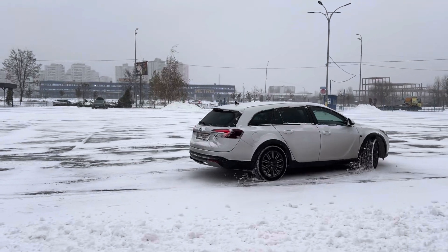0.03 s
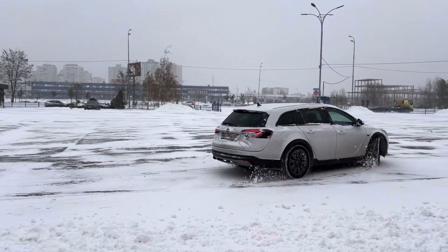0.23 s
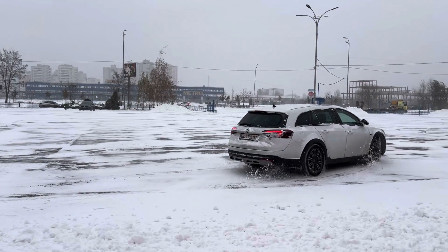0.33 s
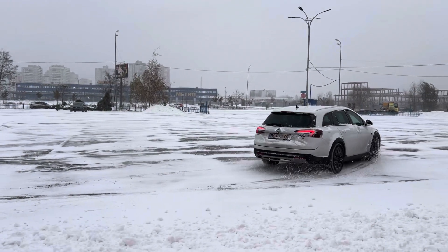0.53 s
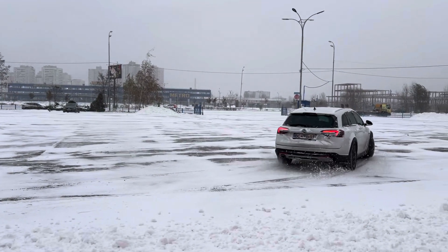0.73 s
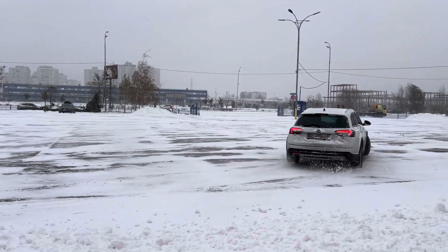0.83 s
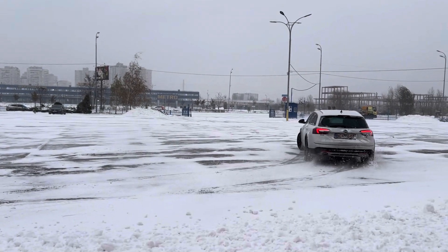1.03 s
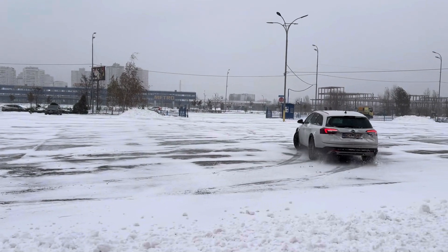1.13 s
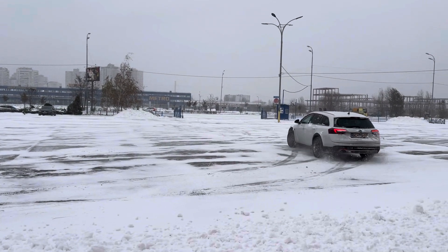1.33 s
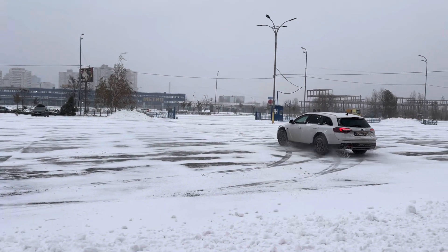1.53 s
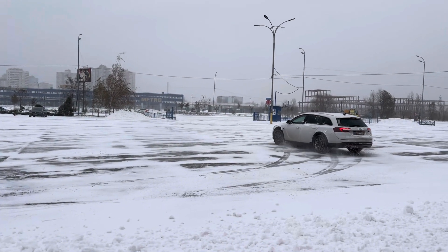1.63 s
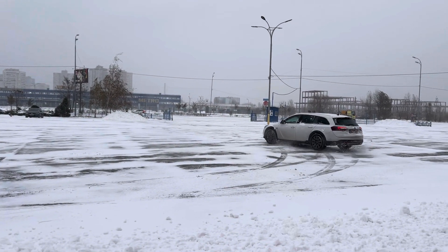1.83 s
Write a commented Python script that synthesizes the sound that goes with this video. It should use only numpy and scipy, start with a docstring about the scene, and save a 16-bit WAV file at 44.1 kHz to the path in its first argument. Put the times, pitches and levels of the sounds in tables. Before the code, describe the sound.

A car engine revs up and falls back as tyres spin and spray snow.

```python
"""A snowy open lot, where an estate car slides round and moves away.
Its four-cylinder engine revs up and falls back. The exhaust radiates at the firing rate and booms
loudest as the tail swings toward the listener; higher orders excite the resonances of the engine bay.
The spinning tyres churn and spray snow, scrub over bare patches and crack ice, and the wheels thud
through ruts. Beneath them lie a rolling rumble and the murmur of a distant town."""
import sys
import numpy as np
from scipy import signal
from scipy.io import wavfile

SR = 44100
rng = np.random.default_rng(int(sys.argv[2]) if len(sys.argv) > 2 else 0)


def output_pcm(signal):
    """Save a mono or channel-first signal as 16-bit PCM at the path in sys.argv[1].

    Samples are clipped to [-1, 1] before scaling.
    """
    pcm = np.clip(np.atleast_2d(signal).T, -1, 1) * 32767
    wavfile.write(sys.argv[1], SR, np.round(pcm).astype(np.int16))


N = 83790
TIME = np.arange(N) / SR


# Firing rate: t/s, f/Hz
FIRING_RATE = [(0, 84.3), (0.15, 96.1), (0.27, 104.5), (0.36, 113.7), (0.45, 124.1), (0.55, 132.1),
               (0.64, 137.6), (0.8, 141.7), (0.93, 146), (1.02, 137.3), (1.15, 123.6), (1.3, 112.1),
               (1.44, 95), (1.58, 76.7), (1.7, 66.37), (1.9, 61.75)]

def engine():
    """Periodic excitation: exhaust and engine bay share one phase, the integral of the firing rate."""
    firing_hz = in_time(FIRING_RATE)
    phase = 2 * np.pi * np.cumsum(firing_hz) / SR
    return exhaust(phase) + engine_bay(firing_hz, phase)


# Harmonics 1, 2 and 3 of the firing rate: relative level/dB
EXHAUST_HARMONICS = [0, -30.5, -35.5]
# Exhaust envelope: t/s, relative level/dB
EXHAUST_LEVEL = [(0.0, -36), (0.046, -28.5), (0.068, -43), (0.248, -24), (0.316, -26.5), (0.37, -19.5),
                 (0.438, -18.5), (0.48, -25), (0.656, -14.5), (0.93, -10.5), (1.158, -24.5), (1.222, -19.5),
                 (1.312, -21), (1.39, -29.5), (1.438, -30.5), (1.496, -42), (1.598, -37.5), (1.66, -28.5),
                 (1.708, -59), (1.9, -41)]

def exhaust(phase, gain_db=-0.5, wobble_db=0.8):
    """Harmonic series: the firing pulses give a strong fundamental with faint overtones."""
    note = sum(from_db(db + wobble_db * drift(24.4)) * np.sin(n * phase)
               for n, db in enumerate(EXHAUST_HARMONICS, start=1))
    return panned(np.sqrt(2) * note * from_db(gain_db + in_time(EXHAUST_LEVEL)), pan_db=1.47)


# Engine bay envelope, screened while the car points away: t/s, relative level/dB
BAY_LEVEL = [(0.0, -33), (0.02, -36.5), (0.782, -23.5), (0.894, -61), (1.062, -39), (1.168, -32.5),
             (1.322, -35.5), (1.418, -35), (1.454, -37), (1.624, -50), (1.644, -42), (1.9, -44.5)]
# Bay resonances: f/Hz, width/Hz, relative level/dB
BAY_RESONANCES = [(65, 20, 1.5), (246, 200, -10.5), (575, 70, -4), (666, 47, -5.5), (873, 42, -6),
                  (1098, 66, -9), (1238, 20, -3), (1810, 200, -15.5)]
# Orders that sing out under load: centre t/s, duration/s, multiple of the firing rate, level/dB
SINGING_ORDERS = [(0.064, 0.25, 3, -38.5), (0.016, 0.13, 7, -35), (0.079, 0.12, 6.5, -30),
                  (0.19, 0.21, 6, -30.5), (0.34, 0.13, 2, -40), (.29, 0.11, 5.5, -31),
                  (0.375, 0.071, 5, -30.5), (0.48, 0.15, 4.5, -27.5), (0.497, 0.1, 9.75, -33),
                  (0.51, 0.15, 8.5, -33), (0.56, 0.37, 3, -38.5), (.7, 0.34, 4, -31.5),
                  (0.66, 0.49, 4.5, -33), (.68, 0.091, 8.75, -43), (1.28, 0.28, 5.5, -37),
                  (1.648, 0.11, 2, -31)]

def engine_bay(firing_hz, phase, gain_db=-5.5, odd_order_db=-8, rough_db=3, jitter_rad=0.17):
    """Forced vibration: orders of the four-stroke cycle swell as they glide through fixed resonances."""
    out, level = np.zeros(N), from_db(gain_db + in_time(BAY_LEVEL))
    for order in range(2, 72):
        multiple = order / 4   # four firings to a cycle; even orders belong to the crank
        power = sum(from_db(db) ** 2 / (1 + 2 * ((multiple * firing_hz - hz) / width) ** 2) ** 2
                    for hz, width, db in BAY_RESONANCES)
        resonant = level * np.sqrt(power) * from_db(odd_order_db * (order % 2))
        singing = sum(from_db(db) * swell(t, duration)
                      for t, duration, m, db in SINGING_ORDERS if round(4 * m) == order)
        amplitude = np.hypot(resonant, singing) * from_db(rough_db * drift(27))
        out += amplitude * np.sin(multiple * phase + rng.uniform(0, 2 * np.pi) + jitter_rad * drift(23))
    return panned(out, pan_db=2.5)


# Churning envelope: t/s, relative level/dB
CHURN_LEVEL = [(0.0, -47), (0.432, -37), (0.566, -36), (0.762, -35), (0.772, -35), (0.878, -36.5),
               (1.122, -44.5), (1.174, -39.5), (1.19, -42.5), (1.306, -40), (1.316, -39), (1.348, -46.5),
               (1.55, -43.5), (1.608, -49), (1.756, -52.5), (1.846, -38), (1.878, -45), (1.9, -44)]
# Churning spectrum: f/Hz, relative density level/dB
CHURN_SPECTRUM = [(300, -29), (400, -6.5), (500, -10.5), (620, -7), (750, -5.5), (900, -3), (1220, -2),
                  (1480, -13.5), (1750, -6.5), (2000, -9.5), (2450, -20), (2850, -13.5), (3300, -28),
                  (3750, -12.5), (4200, -27), (4650, -20), (5000, -31.5), (5400, -36), (7000, -56)]

def churn(gain_db=7, grain_db=1.5):
    """Granular friction: tread blocks grind through packed snow in a grainy rush."""
    level_db = gain_db + in_time(CHURN_LEVEL) + grain_db * drift(225)
    return from_db(level_db) * banded_noise(CHURN_SPECTRUM, flicker_db=0.9, bands=36)


# Envelopes of thrown snow and of fine powder, heard while the wheels are near: t/s, relative level/dB
SPRAY_LEVEL = [(0.0, -53), (0.386, -41), (0.762, -44), (1.184, -59.5), (1.27, -56), (1.688, -60),
               (1.74, -65.5), (1.82, -56), (1.9, -58)]
POWDER_LEVEL = [(0, -72), (.2, -51.5), (.45, -48), (.8, -52.5), (1.05, -65), (1.5, -70.5), (1.7, -84),
                (1.9, -82)]
# Their spectra: f/Hz, relative density level/dB
SPRAY_SPECTRUM = [(1500, -44), (3000, 3), (4400, 4), (5500, 4.5), (7200, -2.5), (8700, 5), (9700, -4.5)]
POWDER_SPECTRUM = [(10300, -14), (11300, 4.5), (12500, -10), (14000, -17), (15600, -8)]

def spray(hiss_db=3.5, grain_db=1.36, patter_db=-9):
    """Superposition of many small impacts: snow flung off the wheels hisses and patters."""
    hiss = from_db(hiss_db + grain_db * drift(220)) * banded_noise(SPRAY_SPECTRUM, flicker_db=2, bands=20)
    powder = from_db(in_time(POWDER_LEVEL)) * banded_noise(POWDER_SPECTRUM, flicker_db=2, bands=6)
    patter = from_db(patter_db) * crumbs()
    return from_db(in_time(SPRAY_LEVEL)) * (hiss + patter) + powder


def crumbs(per_s=770, spread_db=3.5, ring_cycles=5.6, pitches=14):
    """Poisson process: icy crumbs crunch at random instants, each ringing for a few cycles."""
    sizes = from_db(-spread_db * np.minimum(rng.exponential(1, N), 4)) * rng.choice([-1, 1], N)
    clicks = sizes * (rng.random(N) < per_s / SR)
    pitch_index = rng.integers(0, pitches, N)
    return rms_one(sum(panned(ring(clicks * (pitch_index == k), hz, ring_cycles / hz), 8 * (-1) ** k)
                       for k, hz in enumerate(np.geomspace(2600, 8500, pitches))))


# Tread on bare patches: t/s, duration/s, start f/Hz, end f/Hz, level/dB
SCRUBS = [(.747, .04, 1420, 1000, -29), (.886, .064, 1290, 1040, -27), (1.825, .05, 1400, 1100, -38)]

def scrubs(width_hz=110):
    """Stick-slip friction: rubber catches on asphalt in short, hoarse, falling chirps."""
    out = np.zeros(N)
    for t, duration, start_hz, end_hz, db in SCRUBS:
        progress = np.clip((TIME - t) / duration, 0, 1)
        envelope = from_db(db) * np.sqrt(np.abs(np.sin(np.pi * progress)))
        out += envelope * narrow_noise(start_hz + (end_hz - start_hz) * progress, width_hz)
    return panned(out, pan_db=2)


# Blows from ruts: t/s, relative level/dB
RUT_BLOWS = [(.035, -31), (1.631, -28), (1.655, -27)]
# Modes of the car body: f/Hz, relative level/dB, T60/s
BODY_MODES = [(74, -2, .1), (145, -5, .06)]

def ruts(cutoff_hz=600):
    """Impulse response: soft blows from the wheels set the body's damped modes ringing."""
    blows = np.zeros(N)
    for t, db in RUT_BLOWS:
        blows[int(t * SR)] = from_db(db)
    body = sum(from_db(db) * ring(blows, hz, t60) for hz, db, t60 in BODY_MODES)
    return signal.sosfilt(signal.butter(2, cutoff_hz, fs=SR, output="sos"), body)


# Ice cracking under a tyre: t/s, peak level/dB
ICE_CRACKS = [(1.491, -42), (1.843, -44)]

def ice_cracks(rise_s=0.0035):
    """Brittle fracture: bright crunches build and die within milliseconds."""
    envelope = 0
    for t, db in ICE_CRACKS:
        age = np.maximum(TIME - t, 0) / rise_s
        envelope += from_db(db) * age * np.exp(1 - age)
    return envelope * narrow_noise(hz=4450, width_hz=600)


# Hisses of the spinning wheels: centre t/s, duration/s, f/Hz, width/Hz, level/dB
WHEEL_HISSES = [(.25, .7, 2800, 45, -47), (.14, .28, 6450, 70, -55), (.34, .28, 5790, 70, -50),
                (.77, .55, 3750, 110, -43)]

def wheel_hisses():
    """Narrow-band resonance: thin hisses, independent in each ear, come and go as the car turns."""
    return sum(from_db(db) * swell(t, duration) * np.array([narrow_noise(hz, width) for _ in range(2)])
               for t, duration, hz, width, db in WHEEL_HISSES)


# Rumble envelope: t/s, relative level/dB
RUMBLE_LEVEL = [(0.0, -37), (0.058, -35), (0.39, -27), (0.666, -35), (0.82, -27.5), (0.882, -34),
                (1.9, -40.5)]
# Rumble spectrum: f/Hz, relative density level/dB
RUMBLE_SPECTRUM = [(30, -32), (45, -3), (68, 3.5), (100, 1.5), (160, -3.5), (220, -1), (290, -6),
                   (400, -10), (600, -9), (1200, -48)]

def rumble(gain_db=1.5):
    """Random excitation: the rolling wheels give an uneven low-frequency noise."""
    return from_db(gain_db + in_time(RUMBLE_LEVEL)) * banded_noise(RUMBLE_SPECTRUM, flicker_db=4, bands=14)


# Distant town: f/Hz, relative density level/dB
TOWN_SPECTRUM = [(25, -22), (55, 10), (120, 4.5), (185, -2.5), (300, -21.5), (1000, -9.5), (3000, -33.5),
                 (9000, -58), (12000, -73)]

def town(murmur_db=-42, drone_db=-42.5):
    """Stationary noise: a distant broadband murmur with a faint drone."""
    murmur = from_db(murmur_db) * banded_noise(TOWN_SPECTRUM, flicker_db=0, bands=18)
    return murmur + from_db(drone_db) * narrow_noise(hz=185.8, width_hz=11.5)


# Likeness of left and right: f/Hz, correlation coefficient
CORRELATION = [(60, 0.98), (130, 0.82), (290, 0.94), (640, 0.64), (1400, 0.62), (3100, 0.37), (5500, 0.38),
               (8500, -0.086), (15000, -0.45)]

def banded_noise(spectrum, flicker_db, bands):
    """Partial coherence: each flickering band mixes in-phase and antiphase stereo noise; total rms 1."""
    edges = np.geomspace(spectrum[0][0], spectrum[-1][0], bands + 1)
    out, white = 0, rng.standard_normal((2, 2, N))
    for k, (low, high) in enumerate(zip(edges, edges[1:])):
        bandpass = signal.butter(2, [low, high], "band", fs=SR, output="sos")
        mid, side = signal.sosfilt(bandpass, white[k % 2])
        hz = np.sqrt(low * high)
        correlation = at_hz(CORRELATION, hz)
        gain = from_db(at_hz(spectrum, hz) + flicker_db * drift(11.6))
        out += gain * (np.sqrt(1 + correlation) * mid + np.sqrt(1 - correlation) * side * [[1], [-1]])
    return rms_one(out)


def narrow_noise(hz, width_hz):
    """Random quadrature modulation spreads a tone into a narrow band."""
    phase = 2 * np.pi * np.cumsum(hz * np.ones(N)) / SR
    return rms_one(drift(width_hz) * np.cos(phase) + drift(width_hz) * np.sin(phase))


def drift(corner_hz, step=10):
    """Low-pass filtered noise: a smooth random wander of rms 1."""
    pole = np.exp(-2 * np.pi * corner_hz * step / SR)
    white = rng.standard_normal(N // step + 4002)
    slow = signal.lfilter([1], [1, -2 * pole, pole ** 2], white)[4000:]   # once the filter has settled
    return np.interp(np.arange(N) / step, np.arange(len(slow)), rms_one(slow))


def ring(clicks, hz, t60):
    """Damped oscillator: a unit impulse starts a decaying sine of amplitude 1."""
    r, w = np.exp(-np.log(1000) / (t60 * SR)), 2 * np.pi * hz / SR
    return signal.lfilter([0, np.sin(w)], [1, -2 * r * np.cos(w), r * r], clicks + 1e-18)


def swell(centre, duration):
    """Half-cosine window: a rounded rise and fall."""
    return np.cos(np.pi * np.clip((TIME - centre) / duration, -.5, .5))


def panned(x, pan_db):
    """Interaural level difference places a sound left (+) or right (-)."""
    return x * from_db([[pan_db / 2], [-pan_db / 2]])


def in_time(rows):
    """Linear interpolation of a curve at every sample."""
    return np.interp(TIME, *np.transpose(rows))


def at_hz(spectrum, hz):
    """Interpolation on a log-frequency axis."""
    frequencies, values = np.transpose(spectrum)
    return np.interp(np.log(hz), np.log(frequencies), values)


def from_db(db):
    """Level to amplitude ratio."""
    return 10 ** (np.asarray(db) / 20)


def rms_one(x):
    """Normalisation to rms 1."""
    return x / np.sqrt(np.mean(x ** 2) + 1e-20)


def scene():
    """Superposition in a free field: engine, tyres and background add without echoes."""
    background = rumble() + town()
    tyres = churn() + spray() + wheel_hisses() + scrubs() + ruts() + ice_cracks()
    return engine() + tyres + background


def record(dry):
    """Band limiting: a steep low-pass is 70 dB down at 16.8 kHz."""
    return signal.sosfilt(signal.cheby2(12, 70, 16800, fs=SR, output="sos"), dry)


dry = scene()
out = record(dry)
output_pcm(out)
```